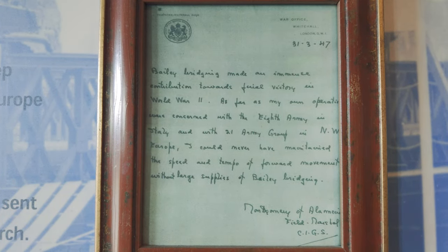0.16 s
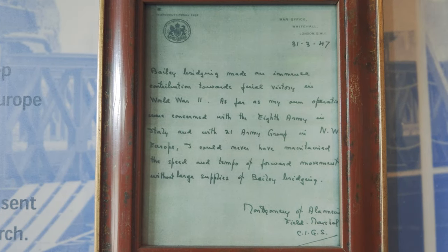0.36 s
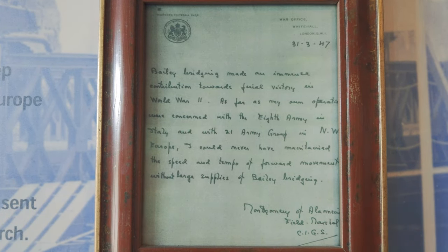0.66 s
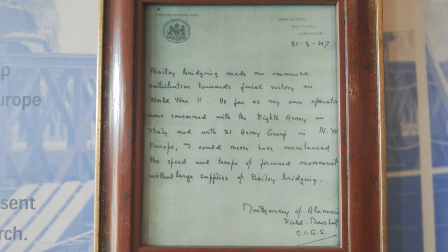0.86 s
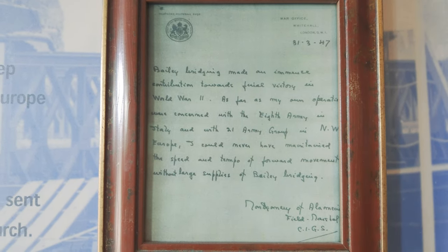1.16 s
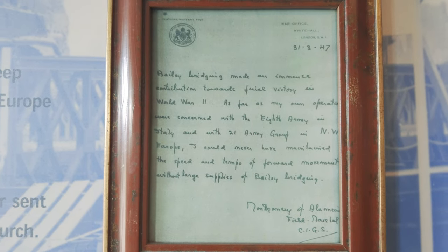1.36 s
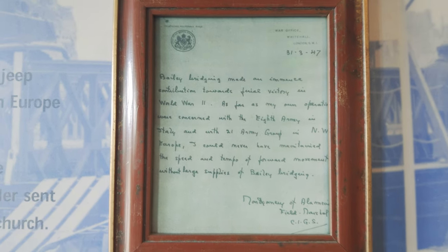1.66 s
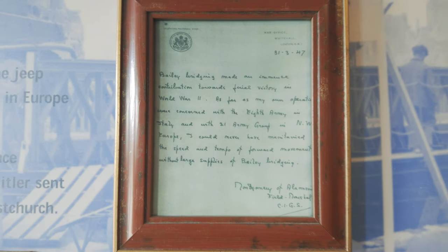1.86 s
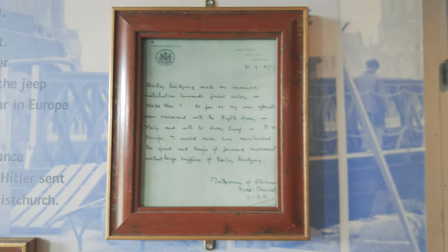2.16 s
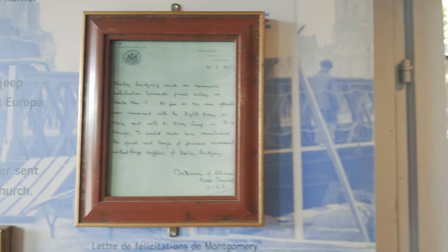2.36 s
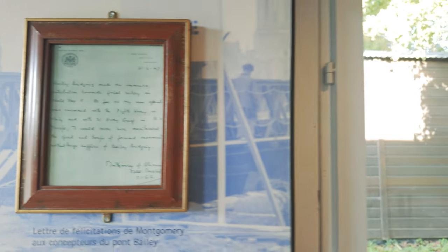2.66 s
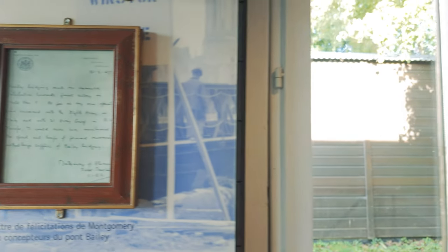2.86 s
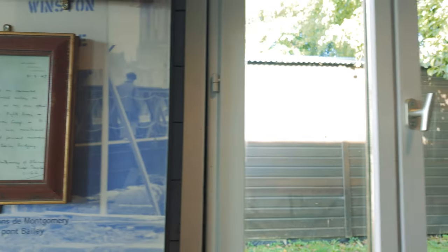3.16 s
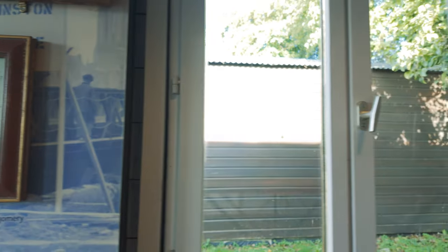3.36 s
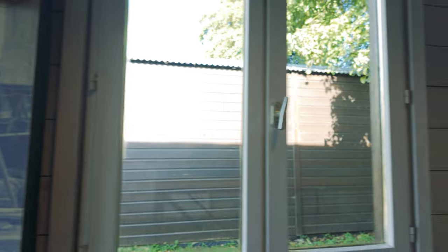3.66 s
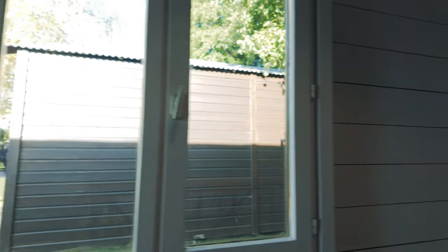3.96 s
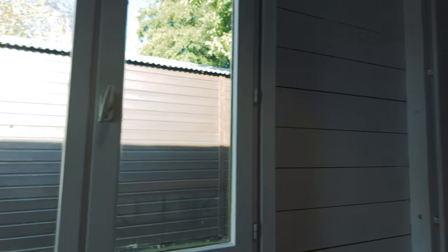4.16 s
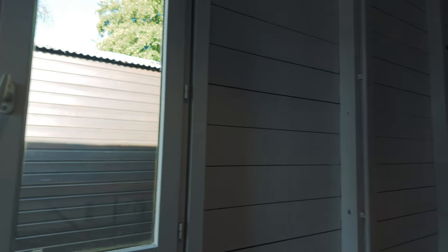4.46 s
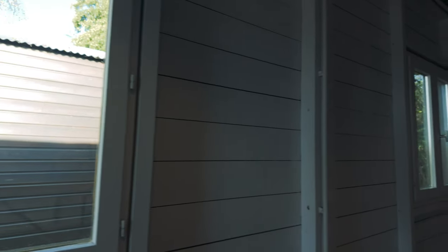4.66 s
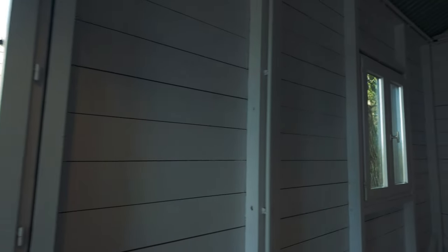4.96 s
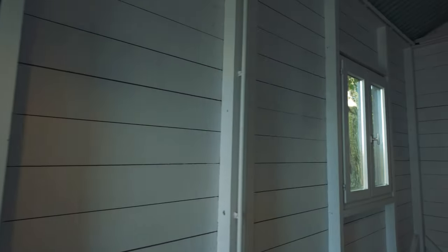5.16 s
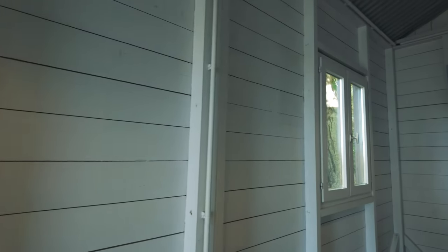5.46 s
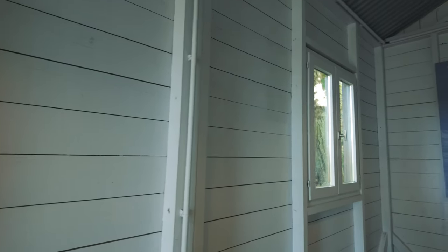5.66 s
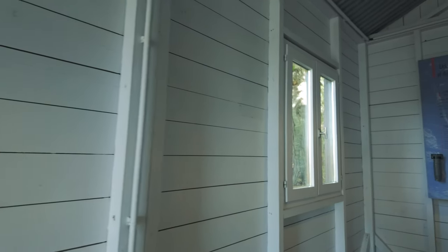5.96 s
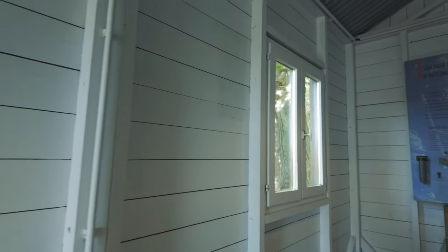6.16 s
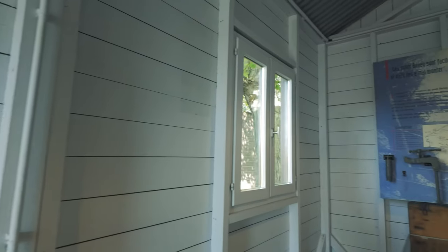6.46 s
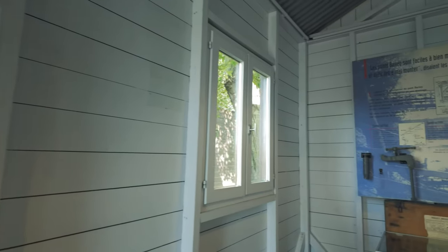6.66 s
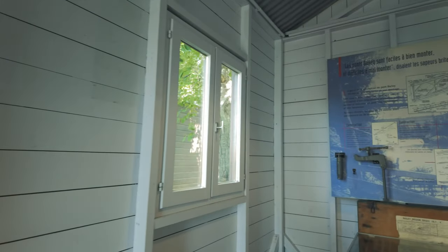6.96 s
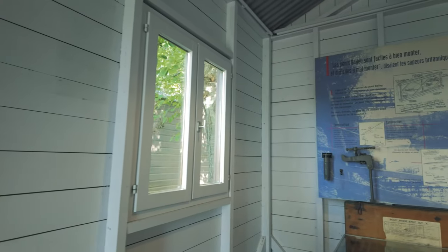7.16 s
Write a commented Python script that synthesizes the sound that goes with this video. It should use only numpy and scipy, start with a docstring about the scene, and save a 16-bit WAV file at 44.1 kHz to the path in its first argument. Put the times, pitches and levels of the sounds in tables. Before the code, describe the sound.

Irregular footsteps on a hollow wooden floor inside a small hut. Soft, heavy low booms dominate, with duller board knocks, faint plank rattle and occasional heel taps. Shoes scuff briefly around three seconds, and a thin creak follows at about four. The strongest thump comes near five seconds. The close stereo microphone adds faint hiss over distant rumble.

```python
"""Uneven footsteps on a hollow plank floor in a small wooden hut.
Each footfall pushes the joists into a low boom, knocks the boards and rattles the planks; heels tap.
Rolling weight excites the joists, soles scuff as grainy noise, small parts tick, a board creaks.
Behind are far rumble and the hiss of a camera microphone; its noise suppressor
lets more treble through while the floor sounds."""
import sys
import numpy as np
from scipy import signal
from scipy.fft import rfft, irfft
from scipy.io import wavfile

SR = 44100
rng = np.random.default_rng(int(sys.argv[2]) if len(sys.argv) > 2 else 0)


def to_wav(s):
    """Save 16-bit WAV."""
    ch = np.atleast_2d(s).T  # columns
    pcm = np.round(np.clip(ch, -1, 1) * 32767)  # PCM
    wavfile.write(sys.argv[1], SR, pcm.astype(np.int16))


def how_loud(loudness_db):
    """Turn decibels into a plain amplitude multiplier (0 dB gives 1, 20 dB gives 10)."""
    steps = np.asarray(loudness_db, float) / 20
    return 10 ** steps


N = 322812

# footfalls and their bounces: (time [s], boom [dB], board knock [dB], plank clatter [dB], settling [s])
FOOTFALLS = [(0.078, -30, -39, -62, 0.077), (0.171, -28.5, -46, -79, 0.036),
             (0.447, -16.5, -31, -49.5, 0.064), (0.538, -20.5, -33, -49, 0.036),
             (0.574, -35, -42, -57.5, 0.017), (0.794, -35, -36.5, -67, 0.043),
             (0.847, -41, -70, -84, 0.025), (0.963, -29, -40, -54, 0.059), (1.024, -21, -36, -52, 0.023),
             (1.049, -23.5, -36.5, -62, 0.018), (1.701, -9, -24, -47.5, 0.032),
             (1.748, -18, -33, -63, 0.045), (1.789, -26.5, -43.5, -62.5, 0.08),
             (2.142, -35, -62, -80, 0.012), (2.447, -40, -59.5, -80, 0.0089),
             (2.687, -25.5, -51.5, -66, 0.23), (2.738, -17, -32.5, -44.5, 0.029),
             (3.095, -31.5, -47.5, -50.5, 0.066), (3.222, -29, -46, -72, 0.03),
             (3.771, -19, -36, -76, 0.12), (3.879, -30, -39.5, -63, 0.014),
             (3.978, -15.5, -28.5, -48.5, 0.048), (4.179, -36, -57, -67, 0.084),
             (4.288, -30, -62.5, -74, 0.099), (4.84, -26.5, -44.5, -59.5, 0.071),
             (4.938, -7, -29, -36, 0.035), (5.104, -37, -44.5, -60, 0.02),
             (5.576, -19, -31.5, -52.5, 0.074), (5.619, -16, -28, -57, 0.033), (5.718, -55, -40, -76, 0.02),
             (5.877, -17, -31, -51.5, 0.07), (6.001, -18.5, -31, -46, 0.047),
             (6.179, -33, -43.5, -63, 0.033), (6.837, -25.5, -49, -72, 0.05),
             (6.955, -9.5, -41, -53, 0.067), (7.273, -37, -45, -80.5, 0.059)]
# left-right likeness of diffuse sound: (frequency [Hz], likeness [0..1])
LIKENESS = [(40, 0.9), (150, 0.92), (400, 0.73), (1000, 0.17), (2000, 0), (16000, 0)]


def rms_one(x):
    """Scales to an rms of one."""
    return x / np.sqrt(np.mean(x ** 2) + 1e-20)


def at_hz(points, hz):
    """Reads a table on a log-frequency axis."""
    table_hz, values = np.array(points)[:, 0], np.array(points)[:, 1]
    return np.interp(np.log(hz), np.log(table_hz), values)


def band_filter(x, order, hz, kind):
    """Causal Butterworth filter."""
    return signal.sosfilt(signal.butter(order, hz, kind, fs=SR, output="sos"), x)


def soften(x, hz):
    """Double one-pole low-pass: a click becomes a rounded push."""
    r = np.exp(-2 * np.pi * hz / SR)
    return signal.lfilter([(1 - r) ** 2], [1, -2 * r, r * r], x)


def coloured(x, spectrum):
    """Gives a white signal the shape of a spectrum, at minimum phase so that nothing sounds early."""
    hz = np.maximum(np.arange(N // 2 + 1) * SR / N, 1)
    cepstrum = irfft(np.log(how_loud(at_hz(spectrum, hz))), N)
    cepstrum[1:N // 2] *= 2
    cepstrum[N // 2 + 1:] = 0
    return irfft(rfft(x) * np.exp(rfft(cepstrum)), N)


def body(force, modes):
    """Parallel decaying modes, all started in step by a blow."""
    out = 0
    for hz, level_db, t60_s in modes:
        r = how_loud(-60 / (t60_s * SR))
        w = 2 * np.pi * hz / SR
        ring = signal.lfilter([0, np.sin(w)], [1, -2 * r * np.cos(w), r * r], force + 1e-18)
        out = out + how_loud(level_db) * ring
    return out


def contacts(times_s, level_db, settle_s, after_db, per_s, swell_s):
    """One blow per contact, then small random bumps that swell and die while the foot settles."""
    force = np.zeros(N)
    t = np.arange(SR // 4) / SR
    for time_s, peak_db, settle in np.broadcast(times_s, level_db, settle_s):
        start = round(time_s * SR)
        bumps = rng.standard_normal(len(t)) * (rng.random(len(t)) < per_s / SR)
        swell_and_die = np.exp(-t / max(settle, 0.003)) * (1 - np.exp(-t / swell_s))
        train = how_loud(after_db) * bumps * swell_and_die
        train[0] = 1   # the blow
        force[start:start + len(t)] += how_loud(peak_db) * train[:N - start]
    return force


def rattle(times_s, level_db, settle_s, spectrum, gain_db, after_db):
    """Hard small contacts, too dense in modes to count, given by their colour."""
    force = contacts(times_s, level_db, settle_s, after_db, per_s=700, swell_s=0.012)
    click = np.zeros(N)
    click[0] = 1
    ring = coloured(click, spectrum)[:SR // 4]
    return how_loud(gain_db) * signal.fftconvolve(force, ring)[:N] / np.abs(ring).max()


def hut(x, direct_db):
    """Direct sound plus a stereo tail of noise dying band by band."""
    # decay of the room: (frequency [Hz], t60 [s])
    decay = [(200, 0.39), (700, 0.36), (2000, 0.43), (6000, 0.78)]
    t = np.arange(SR * 3 // 4) / SR
    edges_hz = 100 * 2 ** np.arange(0, 7.1, 0.5)
    white = rng.standard_normal((2, 2, len(t)))
    tail = 0
    for k, (low_hz, high_hz) in enumerate(zip(edges_hz, edges_hz[1:])):
        mid, side = band_filter(white[k % 2], 2, [low_hz, high_hz], "band")
        alike = np.clip(at_hz(LIKENESS, low_hz) + 0.02, 0, 1)
        t60_s = at_hz(decay, low_hz)
        stereo = np.sqrt(1 + alike) * mid + np.sqrt(1 - alike) * side * [[1], [-1]]
        tail = tail + stereo * how_loud(-60 * t / t60_s) / np.sqrt(t60_s)
    tail *= np.minimum(t / 0.0016, 1)   # the walls answer with a short rise
    tail /= np.sqrt(np.sum(tail ** 2) / 2)
    return how_loud(direct_db) * x + signal.fftconvolve(x[None], tail, axes=1)[:, :N]


def walk_through(x, direct_db, count):
    """The walker moves on, so the hut answers differently from place to place."""
    place = np.linspace(0, count - 1, N)
    out = 0
    for k in range(count):
        nearness = np.maximum(1 - abs(place - k), 0) ** 0.5
        out = out + hut(x * nearness, direct_db)
    return out


def quiet():
    """Far rumble through the walls and flickering microphone hiss, alike in the bass only."""
    # spectrum of rumble and hiss: (frequency [Hz], level [dB per Hz])
    spectrum = [(25, -4.5), (55, 0.5), (95, -9.5), (145, -24.5), (270, -28), (520, -29.5), (950, -32),
                (1900, -38.5), (3200, -37), (4100, -39), (7000, -36), (11000, -33), (15000, -28.5),
                (17000, -38.5)]
    # steep band limit applied to this noise: (frequency [Hz], level [dB])
    band_limit = [(15700, 0), (15850, -50)]
    level_db, flicker_db, flicker_hz = -57.5, 0.44, 25   # flicker as rms

    def share(sign):
        return [(hz, 10 * np.log10(np.clip(1 + sign * alike, 0.001, 2))) for hz, alike in LIKENESS]

    mid, side = rng.standard_normal((2, N))
    both = coloured(mid, share(1)) + coloured(side, share(-1)) * [[1], [-1]]
    noise = rms_one(coloured(coloured(both, spectrum), band_limit))
    flicker = flicker_db * rms_one(soften(rng.standard_normal(N), flicker_hz))
    return how_loud(level_db + flicker) * noise


def creak():
    """A board sings as it bends: a thin wavering tone swells, sags in pitch and fades."""
    # creaks: (time [s], length [s], starting pitch [Hz], level [dB])
    creaks = [(4.06, 0.43, 582, -67), (4.64, .15, 524, -78.5), (5.41, 0.24, 508, -84)]
    sag_hz_per_s = 32
    waver = 1 + 0.55 * rms_one(soften(rng.standard_normal(N), 25))
    out = 0
    for time_s, length_s, hz, level_db in creaks:
        t = np.clip(np.arange(N) / SR - time_s, 0, length_s)
        swell = np.sin(np.pi * np.sqrt(t / length_s))
        tone = np.sin(2 * np.pi * (hz - sag_hz_per_s * t / 2) * t)
        out = out + how_loud(level_db) * swell * tone
    return np.sqrt(2) * waver * out


def ticks():
    """Small parts in shoe or board each ring briefly on one note."""
    # ticks: (time [s], pitch [Hz], level [dB], t60 [s])
    notes = [(0.575, 1456, -60, 0.087), (0.578, 1972, -66, 0.054), (0.789, 3490, -63.5, .01),
             (1.42, 2260, -60.5, .008), (2.102, 1155, -55, 0.017), (2.156, 1880, -62, 0.011),
             (3.045, 1490, -59.5, 0.012), (3.249, 1840, -49, 0.017)]
    out = 0
    for time_s, *mode in notes:
        click = np.arange(N) == round(time_s * SR)
        out = out + body(click, [mode])
    return out


def scuffs():
    """Grit under dragging soles: dense uneven grains, tilted about 1.5 kHz, duller above an edge."""
    # drags: (time [s], length [s], level [dB], brightness [dB per octave])
    drags = [(0.363, 0.21, -70, 3), (0.564, 0.19, -69.5, -3), (1.688, 0.061, -66.5, 6),
             (2.085, 0.41, -70.5, -1), (2.45, 0.18, -68.5, 1), (3.09, 0.2, -54.5, -2),
             (3.224, 0.14, -52.5, -3.5), (4.052, 0.17, -63, -4), (4.987, .06, -64, 3.5),
             (5.098, 0.26, -65.5, -2.5), (6.097, 0.11, -57.5, -0.5), (7.05, 0.18, -65.5, -6),
             (7.228, 0.12, -70.5, -1.5)]
    edge_hz, top_db, fall_db_per_octave = 3364, -3.5, -3
    fade_db, fade_bend = -26.5, 1.47   # loss at the end of a drag; bend over one = holds, then lets go
    grains_per_s = 1200
    sizes = how_loud(3.83 * np.minimum(rng.exponential(1, N), 5)) * rng.choice([-1, 1], N)
    grit = sizes * (rng.random(N) < grains_per_s / SR)
    time_s, length_s, level_db, tilt_db = np.transpose(drags)
    done = (np.arange(N) / SR - time_s[:, None]) / length_s[:, None]
    strokes = (done > 0) * how_loud(fade_db * np.clip(done, 0, 4) ** fade_bend)
    strokes = soften(strokes, 56)
    out = 0
    for octave in np.arange(-4.5, 1.6, 0.5):   # relative to the edge
        low_hz, high_hz = edge_hz * 2 ** octave, edge_hz * 2 ** (octave + 0.5)
        band = rms_one(band_filter(grit, 4, [low_hz, high_hz], "band"))
        above_db = (top_db + fall_db_per_octave * octave) * (octave >= 0)
        tilt = tilt_db * np.log2(min(low_hz, 5000) / 1500)
        out = out + band * (how_loud(level_db + above_db + tilt) @ strokes)
    return out * how_loud(-12)


def heels():
    """Hard heel edges tap the wood, duller or brighter as more or less of the edge strikes."""
    # taps: (time [s], level [dB], level added above the split [dB], settling [s])
    taps = [(0.068, -66, 4.5, 0.037), (0.453, -65, -3, 0.046), (0.539, -67, 1, 0.028),
            (0.574, -60, -5, 0.051), (0.965, -57.5, -5, 0.018), (1.015, -67, 8, 0.034),
            (2.066, -67, -3, .01), (2.68, -65, -10, .02), (2.734, -53, -7, 0.041),
            (3.097, -45.5, -2, 0.067), (3.224, -47.5, 5, 0.035), (3.77, -68, -15, .015),
            (3.987, -60.5, 1, .012), (4.839, -66, -6, 0.037), (4.937, -42, 0.5, 0.033),
            (5.105, -47.5, -7, 0.041), (5.574, -66.5, -6, 0.038), (5.876, -59, 2, .015),
            (6, -50.5, -13, 0.019), (6.835, -72, -11, 0.018), (6.957, -45, 1, 0.027)]
    # colour of a tap: (frequency [Hz], level [dB per Hz])
    colour = [(700, 3), (1100, 10.5), (1500, 2.5), (2200, -3), (3000, -5), (3700, -29), (6000, -30.5)]
    split_hz = 1780
    time_s, level_db, bright_db, settle_s = np.transpose(taps)

    def part(part_db, kind):
        tapping = rattle(time_s, part_db, settle_s, colour, gain_db=10.5, after_db=-7.5)
        return band_filter(tapping, 4, split_hz, kind)

    return part(level_db, "low") + part(level_db + bright_db, "high")


def clatter():
    """The planks rattle at each footfall in hard small contacts."""
    # colour of the planks: (frequency [Hz], level [dB per Hz])
    colour = [(200, -12.5), (320, -5), (450, -6.5), (620, -9), (800, -17.5), (1300, -32.5), (2000, -71)]
    time_s, _, _, clatter_db, settle_s = np.transpose(FOOTFALLS)
    return rattle(time_s, clatter_db, settle_s, colour, gain_db=5.5, after_db=1)


def knock():
    """The boards under the shoe ring shorter and higher than the joists."""
    # modes of the boards: (frequency [Hz], level [dB], t60 [s])
    boards = [(127, -0.5, 0.056), (155.4, 0.5, 0.094), (185.2, 0, 0.12), (215.2, -3.5, 0.15),
              (241.5, -4, 0.14), (268.8, 0, 0.096), (326, -7, 0.079), (381, -16.5, 0.11)]
    time_s, _, knock_db, _, settle_s = np.transpose(FOOTFALLS)
    force = contacts(time_s, knock_db, settle_s, after_db=0.5, per_s=210, swell_s=0.0033)
    push = soften(soften(force, 270), 466)
    return how_loud(-8.5) * body(push, boards)


def weight():
    """Load envelope: each roll of the body loads the joists and lets go; at rest they murmur."""
    # body weight rolling over the joists: (time of most load [s], level [dB])
    rolls = [(0.3, -51), (0.65, -39), (1.02, -40), (1.83, -41), (3.35, -46), (3.96, -35), (4.2, -39.5),
             (4.86, -42), (4.998, -24), (5.3, -47), (5.77, -49), (6.14, -37.5), (6.34, -50), (7.012, -34),
             (7.2, -45.5)]
    rise_db_per_s, fall_db_per_s, rest_db = 151, 148, -58
    load = how_loud(rest_db)
    for time_s, level_db in rolls:
        t = np.arange(0, N, 64) / SR - time_s
        load = load + how_loud(level_db + np.minimum(rise_db_per_s * t, -fall_db_per_s * t))
    return np.repeat(load, 64)[:N]


def boom():
    """Soft heavy pushes and the rolling weight set the joists ringing."""
    # modes of joists and the air under the floor: (frequency [Hz], level [dB], t60 [s])
    joists = [(39, -4, 0.46), (48.5, -0.5, 0.49), (56.6, 4.5, 0.24), (59.5, -7, 0.31), (67.6, 0.5, 0.36),
              (80.75, -6, 0.61), (96.5, -4, 0.33), (113.7, -23, 0.09)]
    time_s, boom_db, _, _, settle_s = np.transpose(FOOTFALLS)
    force = contacts(time_s, boom_db, settle_s, after_db=-9, per_s=120, swell_s=0.01)
    footfalls = how_loud(-3) * body(soften(force, 50), joists)
    rolling = weight() * rms_one(body(rng.standard_normal(N), joists))
    return footfalls + rolling


def scene():
    """Boom and knock sound nearly alike on both sides; the rest is heard mostly through the room."""
    lag_samples = 4   # the bass reaches the left port first
    small = ticks()
    near = clatter() + heels() + scuffs() + small + creak()
    boards = knock()
    lows = boom() + boards
    lows = np.array([lows, np.roll(lows, lag_samples)]) * how_loud([[-0.25], [0.25]])
    room = walk_through(near + how_loud(0.5) * boards, direct_db=-5.5, count=9)
    return lows + room + how_loud(-8) * small + quiet()


def top_cut(x):
    """Nothing passes above the cut-off."""
    return signal.sosfilt(signal.butter(12, 16720, fs=SR, output="sos"), x)


def record(dry):
    """The microphone cuts the deepest bass; its suppressor lifts the treble when the boards sound."""
    release_db_per_s, threshold_db, range_db, lift_db = 160, -76, 11, 3.35
    heard = band_filter(dry, 4, 55, "high")
    sensed = band_filter(np.mean(heard, axis=0), 2, [200, 3000], "band")
    level_db = 10 * np.log10(soften(sensed ** 2, 25) + 1e-12)
    ramp_db = release_db_per_s * np.arange(N) / SR
    held_db = np.maximum.accumulate(level_db + ramp_db) - ramp_db   # peaks held, then released
    opening = np.clip((held_db - threshold_db) / range_db, 0, 1)
    opening = np.roll(opening, -SR // 50)   # looks 20 ms ahead
    opening_db = lift_db * soften(opening, 23)
    treble = signal.sosfiltfilt(signal.butter(2, 2400, "high", fs=SR, output="sos"), heard)
    return top_cut(heard + treble * (how_loud(opening_db) - 1))


dry = scene()
out = record(dry)
to_wav(out)
```